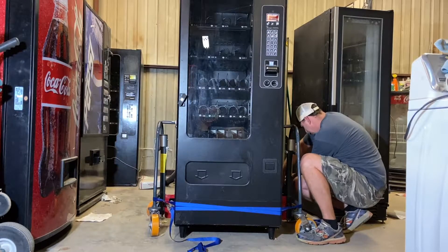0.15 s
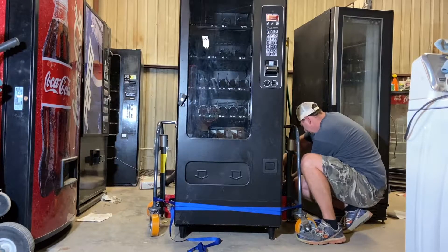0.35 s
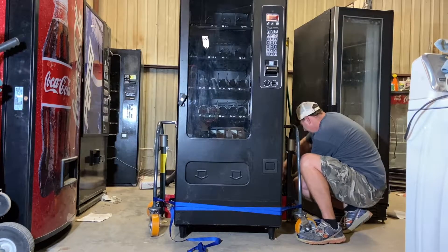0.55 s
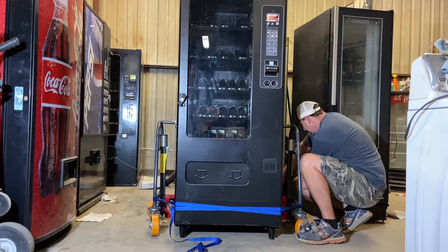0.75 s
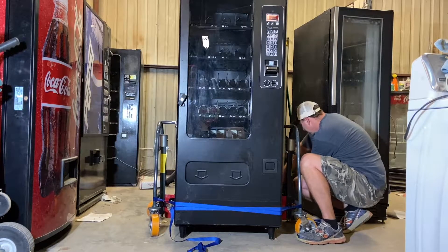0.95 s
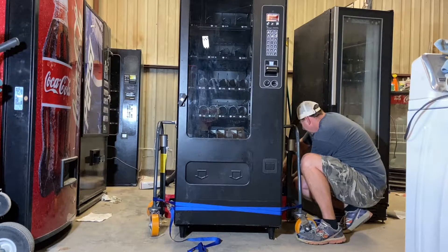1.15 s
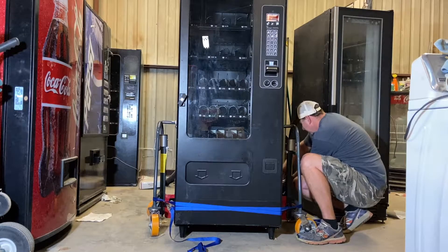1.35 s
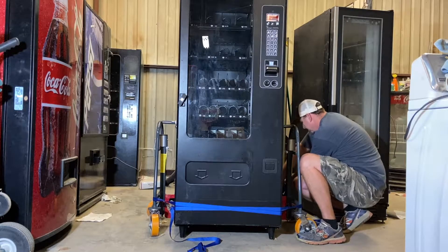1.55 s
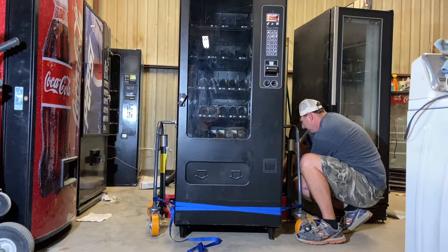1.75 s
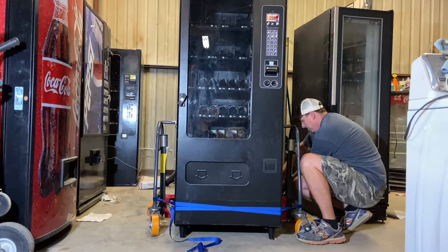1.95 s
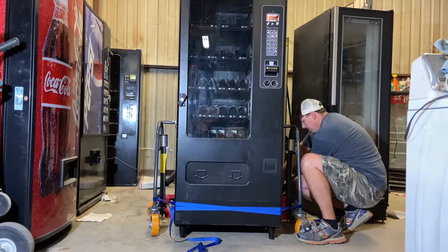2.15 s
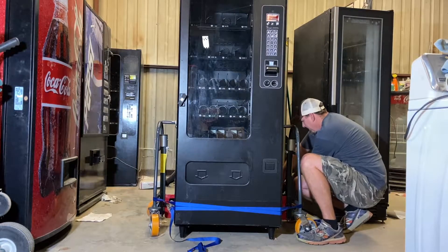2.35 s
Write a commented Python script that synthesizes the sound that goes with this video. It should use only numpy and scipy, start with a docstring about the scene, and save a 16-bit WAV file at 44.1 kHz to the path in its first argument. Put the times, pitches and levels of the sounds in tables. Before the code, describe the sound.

Ratchet strap being tightened on a steel cabinet. Rapid, bright metal clicks and handle knocks from 0.2 to 0.4 s, with dull thuds and a low boom. Echo fades; faint webbing hiss near 0.9 s. Clacks resume at 1.1-1.2 s with heavier thumps, then sparser clicks at 1.45 and 1.8 s. A light click at 2.08 s precedes a thin squeak until 2.3 s. Quiet low rumble, shed reverberation, close stereo microphone.

```python
"""A big shed: a ratchet strap is tightened round a tall steel cabinet on a dolly, over a low rumble. Noise
cracks make the pawl's clicks, which ring the buckle's modes and set loose parts chattering. Low noise makes the
cabinet's thuds and gliding sines its boom; the handle knocks, and the cabinet body rings low, as short rings.
Webbing slides as band-passed hiss, and a hinge squeaks once as a wavering tone with overtones. A diffuse noise
echo is the shed; two close microphone ports hear the treble with a phase lag."""
import sys
import numpy as np
from scipy import signal
from scipy.fft import rfft, irfft
from scipy.io import wavfile

SR = 44100
rng = np.random.default_rng(int(sys.argv[2]) if len(sys.argv) > 2 else 0)


def voltage_ratio(level):
    """Linear amplitude factor for a level in decibels (scalar or array-like)."""
    return 10 ** (np.asarray(level, float) / 20)


def transcribe(u):
    """Save the signal u as a 16-bit wav file named by the first command-line argument.

    u: samples, shape (n,) or (channels, n), limited to [-1, 1]; the rate is SR.
    q: integer samples, one column per channel.
    """
    v = np.clip(np.atleast_2d(u).T, -1, 1)
    q = np.round(v * 32767).astype(np.int16)
    wavfile.write(sys.argv[1], SR, q)


N = 110250
T = np.arange(N) / SR


def at_hz(points, hz):
    """Reads a spectrum table on a log-frequency axis."""
    p = np.array(points, float)
    return np.interp(np.log(hz + 1), np.log(p[:, 0] + 1), p[:, 1])


def rms_one(x):
    """Scales to rms 1."""
    return x / np.sqrt(np.mean(x ** 2) + 1e-20)


def coloured(x, spectrum):
    """Gives white sound a spectrum, keeping the power."""
    gain = voltage_ratio(at_hz(spectrum, np.fft.rfftfreq(x.shape[-1], 1 / SR)))
    return irfft(rfft(x) * rms_one(gain), x.shape[-1])


def drift(rate_hz):
    """Random wander of rms 1: white noise smoothed by two equal poles."""
    r = np.exp(-2 * np.pi * rate_hz / SR)
    wander = signal.lfilter([1], [1, -2 * r, r * r], rng.standard_normal(N + SR))
    return rms_one(wander[SR:])  # the first second lets the filter settle


def band(x, low_hz, high_hz):
    """Band-pass."""
    sos = signal.butter(2, [low_hz, min(high_hz, .45 * SR)], "band", fs=SR, output="sos")
    return signal.sosfilt(sos, x)


def dying(start_s, t60_s, rise_s):
    """Envelope that rises from start_s with time constant rise_s and loses 60 dB in t60_s."""
    age = np.maximum(T - start_s, 0)
    return (1 - np.exp(-age / rise_s)) * voltage_ratio(-60 * age / t60_s)


def ring(hits, hz, t60_s):
    """Two-pole resonator: a unit hit sets a sine of height 1 ringing."""
    r, w = voltage_ratio(-60 / (t60_s * SR)), 2 * np.pi * hz / SR
    return signal.lfilter([0, np.sin(w)], [1, -2 * r * np.cos(w), r * r], hits + 1e-18)


# Spectrum of the low rumble. Each row: frequency in Hz, relative density in dB per Hz.
RUMBLE_COLOUR = [(15, -53.5), (25, -38.5), (40, -3), (58, 1.5), (100, -6), (151, -12.5), (341, -17),
                 (480, -18), (800, -24), (2000, -35.5), (3840, -39.5), (7570, -59.5), (15000, -52.5),
                 (16700, -74)]
RUMBLE_DB, RUMBLE_WAVER_DB = -52.5, 0.5
EARLIER_DB, EARLIER_T60_S = -61, 0.73  # echo of a click just before the start


def rumble():
    """Distant machines and the building's low hum, wavering a little, with an earlier click's dying echo."""
    echo_level = voltage_ratio(EARLIER_DB - 60 * T / EARLIER_T60_S)
    earlier = echo_level * coloured(rng.standard_normal((2, N)), CLICK_COLOUR)
    level = voltage_ratio(RUMBLE_DB + RUMBLE_WAVER_DB * drift(4.2))
    return earlier + level * coloured(rng.standard_normal((2, N)), RUMBLE_COLOUR)


# Webbing sliding through the buckle.
# Each row: start in seconds, length in seconds, level at the top of the swell in dB, centre in Hz.
WEBBING_SLIDES = [(0.88, 0.11, -70.5, 3200), (0.866, 0.1, -75, 3680), (1.635, 0.18, -75, 11500),
                  (0.9, 0.46, -69.5, 4140), (0.014, 0.16, -70, 3400), (1.414, 0.16, -60, 5100),
                  (2.02, 0.07, -59.5, 8900), (1.69, 0.17, -71, 4740), (2.42, 0.07, -76.5, 8700)]
SLIDE_WIDTH = 1.29  # ratio of band edge to centre


def slides():
    """Friction of webbing in the buckle: soft swells of band-passed hiss with a fast 1 dB flutter."""
    noise = rng.standard_normal(N) * voltage_ratio(1.0 * drift(97.0))
    out = np.zeros(N)
    for start, length, db, hz in WEBBING_SLIDES:
        low, high = hz / SLIDE_WIDTH, hz * SLIDE_WIDTH
        hiss = rms_one(band(band(noise, low, high), low, high))  # twice for steeper skirts
        swell = np.sin(np.pi * np.clip((T - start) / length, 0, 1))
        out += voltage_ratio(db) * swell * hiss
    return out


# Reverberation of the shed. Each row: frequency in Hz, time to fall 60 dB in seconds.
SHED_DECAY = [(100, 0.48), (500, 0.49), (1400, 0.73), (3700, 0.52), (7000, 0.49), (10000, 0.24),
              (16000, 0.33)]
SHED_DB, SHED_DELAY_S, SHED_BUILD_S = 3, 0.0018, 0.0055  # level is echo energy over source energy


def shed(x):
    """Diffuse echo: noise that builds and dies band by band, other noise per side."""
    white, t = rng.standard_normal((2, 2, SR)), T[:SR]
    edges = 25 * 2 ** np.arange(0, 9.6, 2 / 3)
    echo = np.zeros((2, SR))
    for k, (low, high) in enumerate(zip(edges[:-1], edges[1:])):
        t60 = at_hz(SHED_DECAY, np.sqrt(low * high))
        echo += band(white[k % 2], low, high) * voltage_ratio(-60 * t / t60)  # neighbours use separate noise
    echo = echo * np.clip((t - SHED_DELAY_S) / SHED_BUILD_S, 0, 1)
    echo = echo / np.sqrt(np.sum(echo ** 2) / 2)
    return voltage_ratio(SHED_DB) * signal.fftconvolve(x[None], echo, axes=1)[:, :N]


# Dull thuds of the cabinet. Each row: start in seconds, level in dB, time to fall 60 dB in seconds.
CABINET_THUDS = [(0.122, -62, 0.52), (0.208, -55, 0.84), (0.327, -41.5, 0.22), (0.382, -43.5, 0.47),
                 (0.5, -54, 0.104), (1.11, -48.5, 0.3), (1.201, -37.5, 0.18), (1.23, -37, 0.25),
                 (1.439, -48.5, 0.28), (1.542, -54.5, 0.33), (1.841, -53.5, 0.17), (2.04, -55, 0.35)]
# Spectrum of the thuds. Each row: frequency in Hz, relative density in dB per Hz.
CABINET_COLOUR = [(40, -19.5), (62, 7.5), (85, 1.5), (120, -10), (200, -6.5), (300, -12), (450, -17),
                  (700, -30), (1500, -33.5), (3000, -82.5)]
THUD_RISE_S = 0.0028


def cabinet_thuds():
    """The cabinet's body thuds: low noise under dying envelopes that add in power."""
    noise = coloured(rng.standard_normal(N), CABINET_COLOUR)
    power = np.zeros(N)
    for start, db, t60 in CABINET_THUDS:
        power += (voltage_ratio(db) * dying(start, t60, THUD_RISE_S)) ** 2
    return np.sqrt(power) * noise


# Chatter of loose parts: grains per second, how much louder grains spread in dB, fall by 60 dB in seconds.
RATTLE_PER_S, RATTLE_SPREAD_DB, RATTLE_T60_S = 400, 2.5, 0.28
# Ringing modes of the buckle. Each row: frequency in Hz, relative level in dB, time to fall 60 dB in seconds.
BUCKLE_MODES = [(2227, -8.5, 0.0188), (3050, -13.5, 0.07), (3830, -21, 0.0092), (4500, -16, 0.025),
                (4845, -4.5, 0.092), (8075, 5.5, 0.025), (8900, -3.5, 0.017), (11100, -24.5, 0.02),
                (15000, -19, 0.017)]
RING_DB, RATTLE_RING_DB = -20.5, -27.5


def buckle_rings(grains):
    """Struck metal: clicks and some of the rattle grains set the buckle's modes ringing."""
    luck_db = rng.normal(0, 2.2, (len(PAWL_CLICKS), len(BUCKLE_MODES)))
    chatter = grains * sum(voltage_ratio(db) * dying(s, RATTLE_T60_S, .005) for s, db, *_ in PAWL_CLICKS)
    rings = np.zeros(N)
    for k, (hz, mode_db, t60) in enumerate(BUCKLE_MODES):
        caught = rng.random(N) < .3  # each mode takes about three grains in ten
        hits = voltage_ratio(mode_db + RATTLE_RING_DB) * chatter * caught
        for (start, db, low_db, top_db), luck in zip(PAWL_CLICKS, luck_db[:, k]):
            band_db = low_db if hz < 5400 else top_db if hz > 9500 else 0
            hits[int(start * SR)] = voltage_ratio(db + mode_db + RING_DB + luck + band_db)
        rings += ring(hits, hz, t60)
    return rings


def click_bands(x):
    """Joins a low, middle and top signal, each in its own band, and colours the sum."""
    joined = band(x[0], 460, 4850) + band(x[1], 5480, 8400) + band(x[2], 10040, 18300)
    return coloured(joined, CLICK_COLOUR)


# Pawl and buckle clicks, levels before the bands and the colour shape them.
# Each row: start in seconds, level in dB, low band over middle in dB, top band over middle in dB.
PAWL_CLICKS = [(0.2078, -21.5, -2.5, 7.5), (0.2701, -26, -0.5, 9.5), (0.285, -27, -4, -3),
               (0.338, -20, -6.5, 1.5), (0.355, -22.5, -7.5, 4), (0.38, -25, 2, 1.5), (0.999, -40.5, 0, 1),
               (1.0915, -39.5, -3, 4), (1.1027, -21.5, -6.5, 3.5), (1.1924, -21, -9, 1),
               (1.2034, -28, -0.5, 3), (1.3631, -33, -2, -1.5), (1.4459, -24.5, -5.5, 0.5),
               (1.5454, -35.5, 2, 1.5), (1.803, -21.5, -4, 3), (2.038, -45.5, 3, 5.5),
               (2.0758, -32.5, -2.5, -1)]
# Spectrum of a click. Each row: frequency in Hz, relative density in dB per Hz.
CLICK_COLOUR = [(400, -31), (900, -18), (1750, -12), (2300, -7.5), (4500, 6.5), (6000, -4), (9000, 1.5),
                (12000, -4.5), (13300, -8.5), (15400, -5), (16400, -48)]
CRACK_T60_S, CRACK_RISE_S = 0.0119, 0.00069
LEAD_S, LEAD_DB = 0.0065, -20  # the pawl scrapes just before it drops
RATTLE_DB, CLICK_ECHO_DB = -9.5, 13.5


def clicks():
    """Pawl drops: three-band cracks, ringing buckle and loose chatter; also the impulses the shed echoes."""
    noise = rng.standard_normal(N)
    loudness = voltage_ratio(RATTLE_SPREAD_DB * np.minimum(rng.exponential(1, N), 4))
    grains = (rng.random(N) < RATTLE_PER_S / SR) * loudness * np.sign(noise)
    crack, pulse = np.zeros((2, 3, N))
    for start, db, low_db, top_db in PAWL_CLICKS:
        gains = voltage_ratio(db + np.array([[low_db], [0], [top_db]]))
        scrape = voltage_ratio(LEAD_DB) * np.clip(1 - (start - T) / LEAD_S, 0, 1) * (T < start)
        shape = dying(start, CRACK_T60_S, CRACK_RISE_S) + scrape
        rattle = voltage_ratio(RATTLE_DB) * dying(start, RATTLE_T60_S, 0.014) * grains
        crack += gains * (shape * noise + rattle)
        pulse[:, int(start * SR)] = gains[:, 0] * voltage_ratio(CLICK_ECHO_DB)
    return click_bands(crack) + buckle_rings(grains), click_bands(pulse)


# Handle knocks on the frame, and a few low, longer rings of the cabinet body. # Each row: start in seconds,
# level of the noise part in dB, pitch in Hz, time to fall 60 dB in seconds.
KNOCKS = [(0.208, -39, 8900, 0.079), (.269, -42, 2730, 0.014), (.356, -42.5, 4810, .04),
          (.371, -37, 5040, 0.011), (0.382, -38, 3940, 0.022), (.394, -36.5, 3760, 0.022),
          (.392, -48.5, 213, .3), (1.104, -44, 4130, 0.047), (1.11, -55, 382, 0.18),
          (1.195, -42.5, 3050, 0.025), (1.215, -45, 978, 0.037), (1.214, -45, 1318, 0.025),
          (1.386, -52, 3430, 0.013), (1.537, -47.5, 626, 0.082), (1.543, -52, 1054, 0.036),
          (1.803, -38, 4310, 0.02), (2.077, -63, 4700, 0.19)]
KNOCK_TONE, KNOCK_WIDTH = 2.2, 1.3  # sine height over noise rms; ratio of band edge to pitch


def knocks():
    """Handle against frame, and a few low rings of the cabinet body: short dying sines with a band of noise
    around each."""
    noise = rng.standard_normal(N)
    out = np.zeros(N)
    for start, db, hz, t60 in KNOCKS:
        tone = KNOCK_TONE * np.sin(2 * np.pi * hz * (T - start))
        around = rms_one(band(noise, hz / KNOCK_WIDTH, hz * KNOCK_WIDTH))
        out += voltage_ratio(db) * dying(start, t60, 0.0015) * (tone + around)
    return out


# Two booms of the cabinet panel, each a list of points.
# Each row: time in seconds, pitch in Hz, rms level in dB.
PANEL_BOOMS = [
    [(0.3, 53.86, -55), (0.36, 55.4, -36.5), (0.418, 55.5, -47), (0.504, 53.6, -40), (0.656, 57.6, -57.5),
     (0.7, 54, -55)],
    [(1.2, 56.0, -39), (1.234, 55.7, -44), (1.384, 52.15, -42), (1.526, 53.7, -61), (1.692, 58, -57),
     (1.72, 51.6, -52)],
]


def cabinet_boom():
    """The panel booms: a low sine whose pitch and level glide from point to point."""
    boom = np.zeros(N)
    for s, hz, db in map(np.transpose, PANEL_BOOMS):
        fade = np.clip(np.minimum(T - s[0], s[-1] - T) / 0.011, 0, 1)
        phase = 2 * np.pi * np.cumsum(np.interp(T, s, hz)) / SR
        boom += fade * np.sqrt(2) * voltage_ratio(np.interp(T, s, db)) * np.sin(phase)
    return boom


# Path of the hinge squeak. Each row: time in seconds, level in dB before the flutter, pitch in Hz.
SQUEAK_PATH = [(2.133, -62, 3826), (2.148, -51.5, 3800), (2.17, -48.5, 3740), (2.195, -44.5, 3907),
               (2.223, -46, 3764), (2.26, -48.5, 3753), (2.3, -63, 3745)]
# Partials of the squeak from the fundamental up. Each entry: relative level in dB.
SQUEAK_PARTIALS = [0, -14, -30, -26]
SQUEAK_WOBBLE, SQUEAK_FLUTTER_DB, SQUEAK_HISS_DB = .032, 4.0, -12.0  # wobble is a share of the pitch


def squeak():
    """Fast stick-slip in the hinge: a wavering, fluttering tone with overtones and hiss."""
    s, db, hz = np.transpose(SQUEAK_PATH)
    pitch = np.interp(T, s, hz) * (1 + SQUEAK_WOBBLE * drift(200.0))
    phase = 2 * np.pi * np.cumsum(pitch) / SR
    tone = sum(voltage_ratio(level) * np.sin((k + 1) * phase) for k, level in enumerate(SQUEAK_PARTIALS))
    hiss = voltage_ratio(SQUEAK_HISS_DB) * coloured(rng.standard_normal(N), CLICK_COLOUR)
    level_db = np.interp(T, s, db, -120, -120) + SQUEAK_FLUTTER_DB * drift(47.0)
    return voltage_ratio(level_db) * (tone + hiss)


TAP_ECHO_DB, SQUEAK_ECHO_DB = -4, -8.0  # sends to the shed; taps are knocks and slides


def scene():
    """Near sounds, their echo and the rumble."""
    thuds = cabinet_thuds()
    cracks, pulses = clicks()
    taps, creak = knocks() + slides(), squeak()
    echoed = thuds + pulses + voltage_ratio(TAP_ECHO_DB) * taps + voltage_ratio(SQUEAK_ECHO_DB) * creak
    return thuds + taps + creak + cracks + cabinet_boom() + shed(echoed) + rumble()


def top_cut(x):
    """Nothing passes above the cut-off."""
    return signal.sosfilt(signal.butter(12, 16820, fs=SR, output="sos"), x)


# How alike the two ports hear the field. Each row: frequency in Hz, likeness from 0 to 1.
LIKENESS = [(60, 1), (150, 0.88), (300, 0.86), (640, 0.01), (1400, 0.11), (2500, 0.44), (5000, 0.01),
            (7000, 0.75), (16000, 1)]
# Balance of the ports. Each row: frequency in Hz, left minus right in dB.
BALANCE = [(60, .3), (500, .4), (1200, 1.4), (3000, 2.3), (6000, 1.5), (9000, 0)]
# Phase between the ports. Each row: frequency in Hz, lag of the left in half turns.
LEFT_LAG = [(0, 0), (7200, 0), (8500, .95), (9500, 1.05), (10900, 1.93), (11600, 2.07), (12700, 2.96),
            (14000, 3.04), (14700, 4), (22050, 4)]


def record(dry):
    """The two ports share part of the field, band by band, with their own phase and balance."""
    hz = np.fft.rfftfreq(N, 1 / SR)
    left, right = rfft(dry)
    alike = np.clip(at_hz(LIKENESS, hz), 0, 1)
    mid = (left + right) / 2 * np.sqrt(1 + alike)
    side = (left - right) / 2 * np.sqrt(1 - alike)
    lag_hz, half_turns = np.transpose(LEFT_LAG)
    lag = np.exp(-.5j * np.pi * np.interp(hz, lag_hz, half_turns))
    half = lag * voltage_ratio(at_hz(BALANCE, hz) / 2)  # each port takes half the lag and balance
    mix = irfft(np.array([(mid + side) * half, (mid - side) / half]), N)
    return top_cut(mix)


dry = scene()
out = record(dry)
transcribe(out)
```